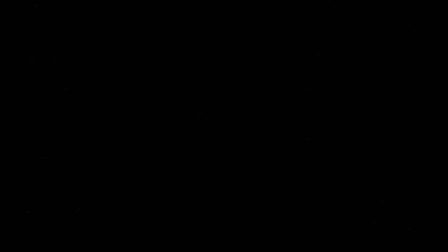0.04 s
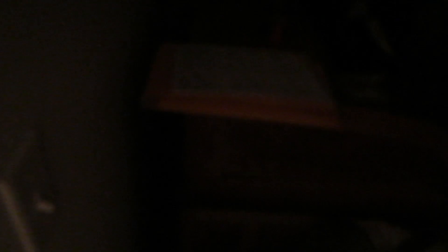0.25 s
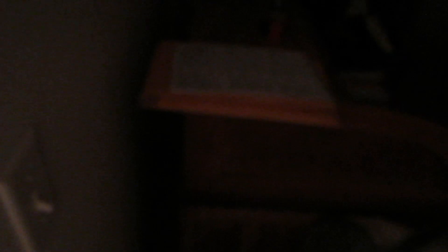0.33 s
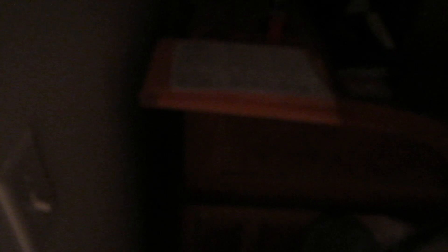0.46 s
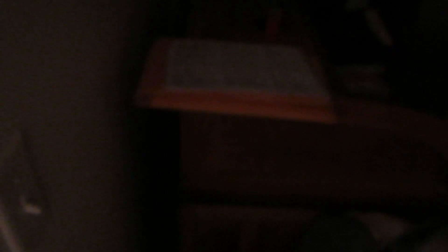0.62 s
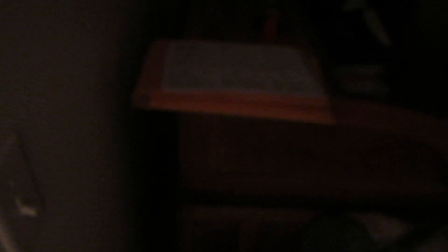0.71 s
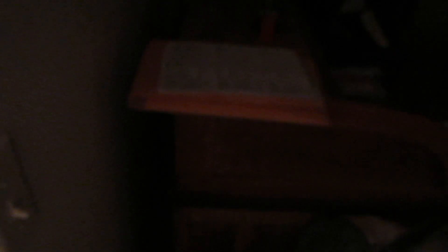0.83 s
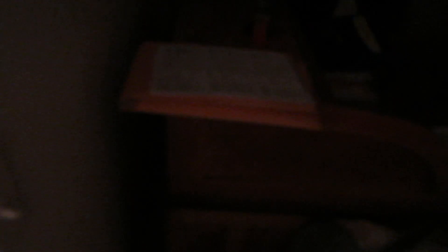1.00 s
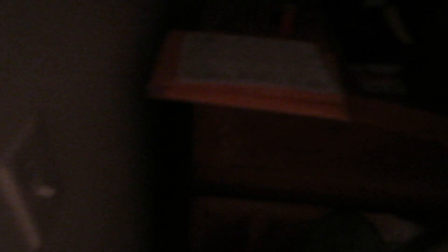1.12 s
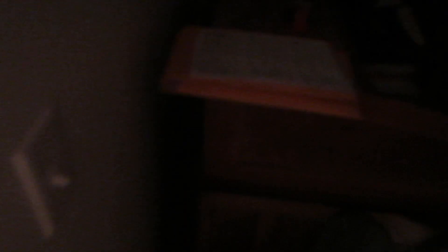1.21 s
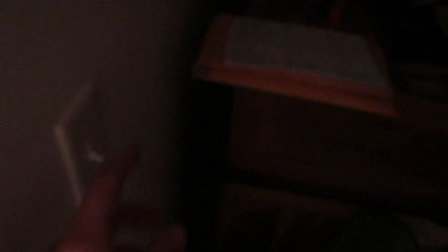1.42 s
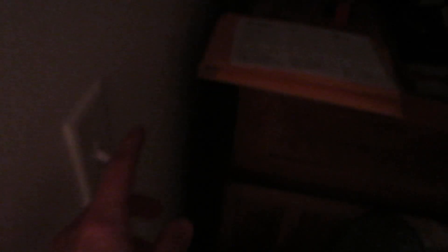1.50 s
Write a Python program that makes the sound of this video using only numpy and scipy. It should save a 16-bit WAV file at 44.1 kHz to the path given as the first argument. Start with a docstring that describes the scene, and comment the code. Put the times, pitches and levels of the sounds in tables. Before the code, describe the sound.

A light switch clicks once, close by, in a quiet room with faint hum.

```python
"""A finger rubs on a plastic plate, then a wall switch snaps over, close by in a small, quiet room.
The toggle makes a few quick impacts that excite the damped modes of the plate and the wall,
and the room answers with early reflections and a short reverberation.
Faint taps and dull bumps go with the movement, over a low hum, a rush and hiss.
A brighter hiss swells in at about one second and stays."""
import sys
import numpy as np
from scipy import signal
from scipy.fft import rfft, irfft, next_fast_len
from scipy.io import wavfile

SR = 44100
rng = np.random.default_rng(int(sys.argv[2]) if len(sys.argv) > 2 else 0)


def generate_wav(signal):
    """Clip the signal to [-1, 1] and save it as 16-bit WAV at the path in sys.argv[1]."""
    frames = np.transpose(np.atleast_2d(signal))
    scaled = np.clip(frames, -1, 1) * 32767
    pcm = np.round(scaled).astype(np.int16)
    wavfile.write(sys.argv[1], SR, pcm)


N = 68355
T = np.arange(N) / SR
RADIATE_HZ = 207   # a small plate radiates little bass below this


def from_db(db):
    """Amplitude ratio: a factor of ten for every 20 dB."""
    return 10 ** (np.asarray(db) / 20)


def level(points):
    """Amplitude envelope, linear in decibels between (time_s, level_db) points."""
    return from_db(np.interp(T, *np.transpose(points)))


def at_hz(points, hz):
    """Interpolation of (frequency_hz, value) points on a logarithmic frequency axis."""
    frequency_hz, value = np.transpose(points)
    return np.interp(np.log(hz + 1e-9), np.log(frequency_hz), value)


def decay(t60_s):
    """Exponential decay: the envelope falls 60 dB in t60_s."""
    return np.exp(-np.log(1000) * T / t60_s)


def pan(left_db):
    """Interchannel level difference: the left gains left_db and the right loses as much."""
    return from_db([[left_db], [-left_db]])


def impulses(times_s, level_db):
    """Ideal impulses: each excites all frequencies equally."""
    train = np.zeros(N)
    np.add.at(train, np.round(times_s * SR).astype(int), from_db(level_db))
    return train


def cut(x, order, corner_hz, kind):
    """Low-pass or high-pass filtering, 6 dB per octave for each order."""
    return signal.sosfilt(signal.butter(order, corner_hz, kind, fs=SR, output="sos"), x)


def convolve(x, response):
    """Superposition: every input sample starts a scaled copy of the impulse response."""
    return signal.fftconvolve(np.atleast_2d(x), response, axes=1)[:, :N]


def diffuse_noise(spectrum):
    """Diffuse field: coloured noise of unit rms, partly correlated between left and right."""
    # left-right likeness of the field: frequency_hz, correlation
    likeness = [(60, 0.16), (300, 0.58), (700, 0.024), (1100, 0.092), (2200, 0.37), (4500, 0.14),
                (8000, -0.21), (13000, 0.063)]
    size = next_fast_len(N)
    hz = np.arange(size // 2 + 1) * SR / size
    mid, side = rfft(rng.standard_normal((2, size)))
    alike = np.clip(at_hz(likeness, hz), -1, 1)
    stereo = np.sqrt(1 + alike) * mid + np.sqrt(1 - alike) * side * np.array([[1], [-1]])
    noise = irfft(stereo * from_db(at_hz(spectrum, hz)), size)[:, :N]
    return noise / np.std(noise)


def background():
    """Incoherent noises add: steady low room tone, an airy rush to the right, and hiss."""
    # spectra of the three noises: frequency_hz, relative_density_db
    tone_spectrum = [(20, -22), (35, -9.5), (52, -14), (72, 2), (100, 0.5), (160, 0), (230, 0.5),
                     (320, 1.5), (450, -6), (750, -33.5), (1500, -37), (16000, -71)]
    rush_spectrum = [(200, -2), (450, -1), (640, 3.5), (820, 2), (920, -1.5), (990, 5), (1080, 2),
                     (1180, 2), (1320, -7), (1470, 2), (1580, -10), (1800, -8), (2300, -15.5), (3000, -21),
                     (3700, -43), (16000, -75)]
    hiss_spectrum = [(500, 3.5), (2500, 4), (3300, -4.5), (3850, -5.5), (4700, -3), (6900, 1.5),
                     (8500, -2.5), (10500, -4.5), (11500, -12), (16000, -14)]
    # slow drifts of level: time_s, level_db
    rush_level = [(0, -48), (.2, -44.5), (.45, -51), (.62, -49.5), (.8, -51), (.95, -52), (1.02, -45.5),
                  (1.2, -46.5), (1.42, -47.5), (1.53, -46)]
    hiss_level = [(0, -61.5), (.19, -59), (.42, -65.5), (.7, -62.5), (.95, -62.5), (1.55, -66.5)]
    tone = from_db(-47) * diffuse_noise(tone_spectrum) * pan(left_db=-0.57)
    rush = level(rush_level) * diffuse_noise(rush_spectrum) * pan(left_db=-1.5)
    hiss = level(hiss_level) * diffuse_noise(hiss_spectrum)
    return tone + rush + hiss


def hum():
    """Slow frequency and amplitude modulation make a low pure tone waver."""
    # swells of the hum: time_s, level_db
    hum_level = [(0, -57), (.14, -50), (.26, -61), (.42, -59), (.6, -60), (.8, -54), (1.3, -68),
                 (1.38, -47.5), (1.55, -51)]
    pitch_hz, waver_hz = 76, 0.76
    waver = np.interp(T, np.linspace(0, T[-1], 20), rng.standard_normal(20))
    phase = 2 * np.pi * np.cumsum(pitch_hz + waver_hz * waver) / SR
    return np.sqrt(2) * level(hum_level) * np.sin(phase)


def late_hiss():
    """Broadband noise under a slow envelope: a bright hiss swells in at about one second and stays."""
    # spectrum of the hiss: frequency_hz, relative_density_db
    spectrum = [(1500, -1.5), (3000, -1), (3850, -8), (4800, -3), (6800, 1), (10000, 0), (12000, -5),
                (16000, -13)]
    # course of the swell: time_s, level_db
    swell = [(.93, -75), (1.0, -60), (1.07, -58), (1.18, -60.5), (1.32, -56.5), (1.42, -58.5),
             (1.53, -55.5)]
    return level(swell) * diffuse_noise(spectrum) * pan(left_db=1)


def finger_rub():
    """Sliding friction of a finger on the plate makes noise with a few narrow peaks."""
    # spectrum of the rubbing: frequency_hz, relative_density_db
    spectrum = [(400, -26), (620, -8.5), (850, -31), (990, -10), (1050, 7), (1105, -6), (1175, 1.5),
                (1260, -12), (1450, -10), (1650, -23.5), (2500, -28), (3500, -60), (16000, -75)]
    # two strokes before the flip: time_s, level_db
    strokes = [(0, -69), (.015, -35.5), (.036, -47), (.055, -63), (.09, -43.5), (.13, -34.5), (.165, -47.5),
               (.2, -47), (.23, -98)]
    return level(strokes) * diffuse_noise(spectrum) * pan(left_db=1.8)


def bumps():
    """Soft impacts of handling carry mostly low frequencies: bell-shaped swells of dull noise."""
    # the bumps: centre_s, level_db, half_length_s
    swells = [(0.008, -45.5, 0.043), (0.622, -42, 0.041)]
    # their spectrum: frequency_hz, relative_density_db
    spectrum = [(100, -8.5), (230, 7.5), (320, 3), (430, -12), (780, -4), (1000, -20), (3000, -36),
                (16000, -80)]
    envelope = sum(from_db(db) * np.exp(-((T - centre_s) / half_s) ** 2) for centre_s, db, half_s in swells)
    return envelope * diffuse_noise(spectrum)


def echoes(direct):
    """Early reflections: nearby furniture returns delayed, weaker copies of the sound."""
    # reflection paths: delay_s, gain_db
    paths = [(.0019, -10), (.0067, -25), (0.0101, -23)]
    return convolve(direct, impulses(*np.transpose(paths))[None])


def room(knocks):
    """Reverberation: diffuse reflections build up quickly, then each band decays at its own rate."""
    # spectrum of the click as it fills the room: frequency_hz, relative_density_db
    spectrum = [(100, -43), (170, -31), (205, -3), (290, -7.5), (420, -10), (600, 0.5), (800, -1.5),
                (980, -0.5), (1130, 2), (1270, -1), (1480, 1.5), (1750, -7.5), (2050, -7), (2450, -2),
                (2800, -10), (3150, -15), (3600, -22), (4100, -22.5), (5200, -21.5), (6200, -24.5),
                (7700, -21), (10000, -28), (12300, -30), (13500, -40), (16000, -46)]
    # reverberation time by band: upper_edge_hz, t60_s
    bands = [(450, 0.5), (1600, 0.34), (4000, 0.4), (9500, 0.42), (18000, 0.26)]
    delay_s, build_s, bass_limit_hz = 0.0012, 0.0088, 166
    rest, tail = diffuse_noise(spectrum), 0
    for edge_hz, t60_s in bands:
        band = signal.sosfiltfilt(signal.butter(4, edge_hz, fs=SR, output="sos"), rest)
        rest = rest - band
        tail = tail + band * decay(t60_s)
    build_up = np.clip((T - delay_s) / build_s, 0, 1)
    response = cut(tail * build_up, 4, bass_limit_hz, "high")   # the reverberation carries no deep bass
    return from_db(-21) * pan(left_db=0.25) * convolve(knocks, response)


def ring(force, modes):
    """Modal vibration: each mode is a damped oscillator that answers an impulse with a decaying sine."""
    vibration = 0
    for pitch_hz, level_db, t60_s in modes:
        radius = np.exp(-np.log(1000) / (t60_s * SR))
        angle = 2 * np.pi * pitch_hz / SR
        feedback = [1, -2 * radius * np.cos(angle), radius * radius]
        mode = signal.lfilter([0, radius * np.sin(angle)], feedback, force + 1e-18)
        vibration = vibration + from_db(level_db) * mode
    return vibration


def plastic(knocks, cracks, contact_hz, t60_scale=1):
    """Impact on plastic: ringing modes, a bright crack and their echoes; softer contact rings duller."""
    # modes of the plate and the wall behind it: pitch_hz, level_db, t60_s
    modes = [(232, -22.5, 0.068), (392, -31.5, 0.078), (480, -32.5, 0.1), (580, -59, .06),
             (734, -35, 0.059), (914, -22.5, 0.064), (1040, -20.5, 0.023), (1158, -14.5, 0.04),
             (1350, -19.5, 0.025), (1740, -34, .014), (1870, -17.5, 0.0084), (2120, -33, .01),
             (2600, -23, .016)]
    # spectrum of the crack: frequency_hz, relative_density_db
    crack_spectrum = [(1000, 7.5), (2800, 8), (3700, -16), (5200, -7), (8000, -2), (10000, -9), (12200, -3),
                      (13500, -34), (16000, -31)]
    force = cut(knocks + 1e-18, 5, contact_hz, "low")
    vibration = ring(force, np.array(modes) * [1, 1, t60_scale])
    body = cut(vibration, 6, RADIATE_HZ, "high")
    burst = from_db(-31.5) * diffuse_noise(crack_spectrum) * decay(t60_s=0.03)
    direct = pan(left_db=2.2) * body + pan(left_db=2) * convolve(cracks, burst)
    return direct + echoes(direct)


def taps():
    """Contact damping: a soft fingertip touches the plate and cuts its ringing short."""
    # light touches: start_s, level_db
    touches = [(0.393, -26), (0.7914, -26), (0.9908, -23.5)]
    start_s, level_db = np.transpose(touches)
    knocks = impulses(start_s, level_db)
    return plastic(knocks, cracks=knocks, contact_hz=1320, t60_scale=0.52) + from_db(-24) * room(knocks)


def switch():
    """Snap action: the toggle lets go, hits its stop and rebounds; the hardest knock excites the room."""
    # contacts of the toggle: start_s, knock_db, crack_db
    contacts = [(0.1999, -13, -7), (0.2013, -8, 8), (0.2031, 1.5, -3), (0.2068, -2.5, -21)]
    # faint, lightly damped modes of the wall and the room: pitch_hz, level_db, t60_s
    long_modes = [(211, -33.5, 0.28), (244.4, -35, 0.28), (284.3, -39, 0.56), (375, -38, 0.48),
                  (505.3, -39, 0.2), (626.7, -35, 0.29), (900, -38.5, 0.27), (1045, -40, .3),
                  (1146, -33, 0.47), (1344, -47, 0.32), (1370, -44, 0.25), (1665, -50, 0.23),
                  (2266, -39, 0.33), (2424, -49, 0.34), (5360, -51, 0.41)]
    start_s, knock_db, crack_db = np.transpose(contacts)
    snap = plastic(impulses(start_s, knock_db), impulses(start_s, crack_db), contact_hz=2720)
    hardest = impulses(start_s[[np.argmax(knock_db)]], level_db=0)
    after_ring = cut(ring(hardest, long_modes), 4, RADIATE_HZ, "high")
    return snap + room(hardest) + pan(left_db=0.5) * after_ring


def scene():
    """Sound pressures add: the switch and the handling sounds, over the background."""
    return switch() + taps() + finger_rub() + bumps() + late_hiss() + hum() + background()


def record(dry):
    """Frequency response of the microphone: a dip in the treble and a steep cut at the top."""
    dip_hz, dip_q, dip_share, cutoff_hz = 3740, 4.45, 0.46, 15800
    dipped = dry - dip_share * signal.lfilter(*signal.iirpeak(dip_hz, dip_q, fs=SR), dry)
    return signal.sosfilt(signal.ellip(10, .1, 90, cutoff_hz, fs=SR, output="sos"), dipped)


dry = scene()
out = record(dry)
generate_wav(out)
```